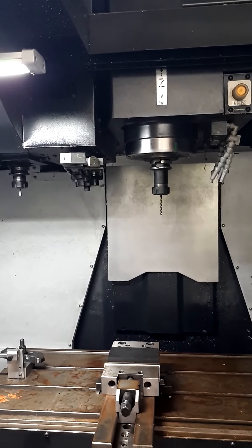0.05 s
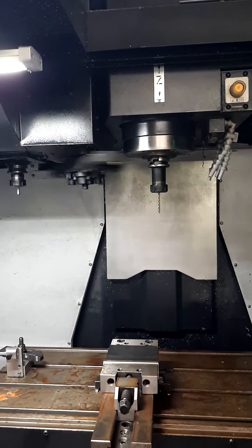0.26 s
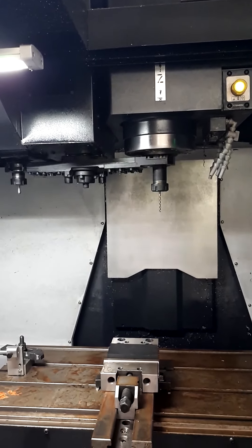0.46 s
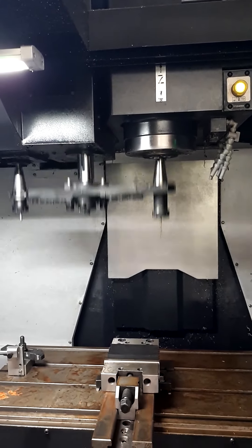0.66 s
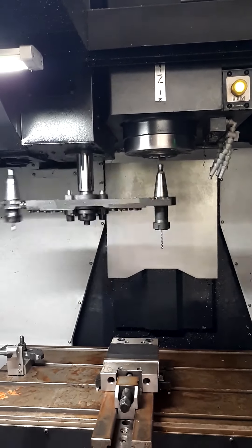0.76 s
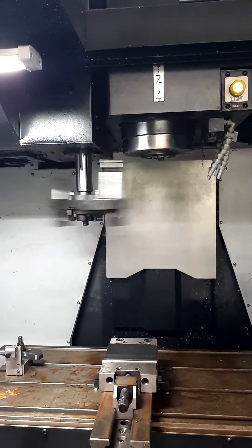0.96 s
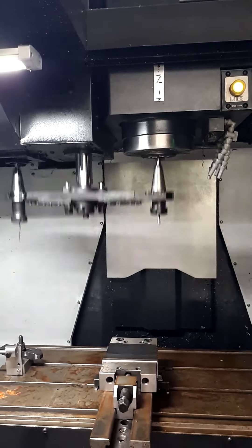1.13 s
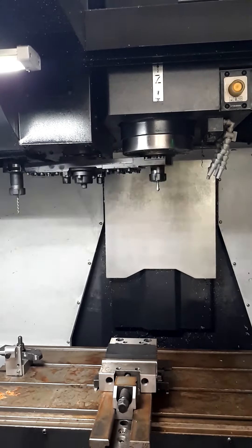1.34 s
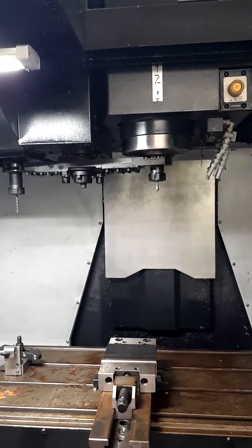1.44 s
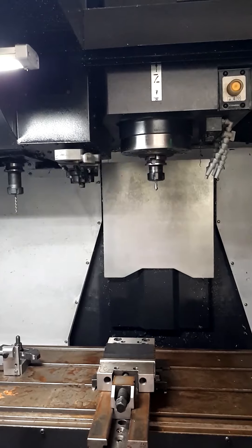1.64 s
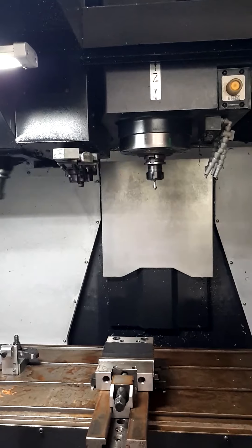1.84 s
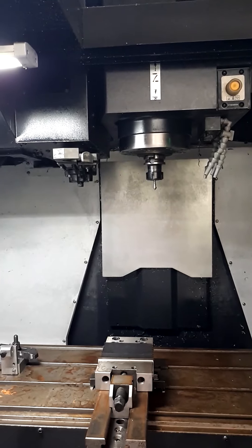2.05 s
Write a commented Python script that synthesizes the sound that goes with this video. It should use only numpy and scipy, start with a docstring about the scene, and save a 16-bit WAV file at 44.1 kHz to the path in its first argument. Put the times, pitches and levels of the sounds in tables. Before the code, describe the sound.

A loud, bright compressed-air blast from a machining centre's spindle fills about 0.5-1.65 s, with a wavering high whistle and brief squeals near 0.7 and 1.35 s. Before it, faint leak hiss, a small clunk and puff at 0.2 s, then hard clunks, valve puff and drive rumble from 0.44 s. Closing clunks and puffs follow at 1.4-1.8 s, leaving leaking air in a close, metallic enclosure.

```python
"""Inside the sheet-metal enclosure of a machining centre, two close microphones hear a tool change.
Air blasts through the spindle taper as noise with fixed and moving resonances, whistling at an edge
and squealing briefly. The arm clunks onto the holders: dying contacts ring the modes of arm and frame.
Valves puff in decaying hiss. The drive rumbles, a leak hisses and the shop lies behind, all shaped noise."""
import sys
import numpy as np
from scipy import signal
from scipy.fft import rfft, irfft
from scipy.io import wavfile

SR = 44100
rng = np.random.default_rng(int(sys.argv[2]) if len(sys.argv) > 2 else 0)


def boost_factor(decibels):
    """Convert a level in decibels to a linear amplitude factor."""
    exponent = np.asarray(decibels, float) / 20
    return 10 ** exponent


def persist_wave(psi):
    """Save psi, clipped to +-1, as 16-bit WAV."""
    counts = np.round(np.clip(psi, -1, 1) * 32767).astype(np.int16)
    wavfile.write(sys.argv[1], SR, np.atleast_2d(counts).T)


N = 92610
T, HZ = np.arange(N) / SR, np.arange(N // 2 + 1) * SR / N   # time in s, spectrum bins in Hz

# Every colour table gives a spectrum's shape: pitch_hz, density_db (per Hz, relative).
# Air blast: start_s, level_db, extra_db above SPLIT_HZ, bore_hz, bore_level_db
BLAST = [(.5,-52,12,8320,-133),(.6,-53,16,8520,-53),(.65,-33,4.5,8300,-46),(.8,-29,-2,8340,-35.5),(.95,-32,1.5,8460,-39),(1.1,-31.5,2.5,8450,-32.5),(1.17,-32.5,3.5,8660,-31),(1.3,-30,-0.5,8610,-27.5),(1.42,-31.5,5,8490,-31.5),(1.45,-35,4.5,8750,-43),(1.5,-34.5,-3,8880,-46),(1.6,-43,10,8480,-53),(1.65,-43,3,8560,-53),(1.74,-76,-31,8580,-75)]
BLAST_COLOUR = [(180,-23),(300,-24.5),(620,-15.5),(900,-15),(1250,-15),(1700,-14.5),(2200,-11),(2700,-10),(4000,-7),(5250,-11.5),(6200,-12),(7000,-9),(7700,-1.5),(8600,-3),(9200,-14),(10200,-6),(11200,-13.5),(13500,-14.5),(15900,-13.5)]
SPLIT_HZ, BORE_WIDTH_HZ, BORE_LEFT_DB = 8200, 174, 4.5
# Fixed taper resonances: pitch_hz, width_hz, level_db (at the blast's mean level)
TAPER = [(770,65,-56),(960,200,-59),(1691,76,-57.5),(2700,240,-50),(5974,750,-45)]
TAPER_WANDER = 0.025   # share of pitch
TOOL_OUT_S, TOOL_IN_S, TAPER_FADE_S = 0.535, 1.45, 0.11   # the taper stands open between

# Edge whistle pitch: start_s, pitch_hz
WHISTLE_PITCH = [(.53,12380),(.61,12480),(.68,12580),(.87,12645),(1.05,12720),(1.3,12725),(1.38,12760),(1.45,12610),(1.5,12630),(1.64,12590)]
# Edge whistle level before the left-right balance: start_s, level_db
WHISTLE_LEVEL = [(.52,-62),(.58,-46),(.7,-38.5),(.75,-35.5),(.8,-41),(.88,-35),(.99,-39),(1.05,-47),(1.15,-37),(1.24,-35.5),(1.37,-44.5),(1.42,-31.5),(1.47,-28),(1.5,-31.5),(1.56,-47),(1.61,-48),(1.65,-70)]
WHISTLE_WIDTH_HZ, WHISTLE_LEFT_DB = 82, 10
WHISTLE_FLICKER_DB, WHISTLE_FLICKER_HZ = 3.5, 18.0
# Brief resonances as the tool opens and closes the gap: start_s, length_s, pitch_hz, width_hz, level_db
SQUEALS = [(0.652,0.12,3100,890,-36),(1.322,0.086,2700,198,-34.5),(1.417,0.02,6170,120,-31)]

# Arm clunks: start_s, level_db (before the enclosure mix), rattle_t60_s, contact_centre_hz, width_octaves
CLUNKS = [(.196,-42,0.87,680,0.57),(0.437,-47.5,0.96,171,0.39),(.45,-41.5,0.13,885,0.18),(.458,-33.5,0.76,1554,0.94),(.472,-36.5,0.3,450,0.6),(.492,-45.5,0.02,430,0.46),(.517,-33.5,0.15,370,0.3),(0.575,-38.5,0.6,392,0.39),(0.628,-44.5,1,148,0.96),(1.401,-49.5,1.6,450,0.68),(1.445,-49,0.51,125,0.4),(1.543,-39.5,0.49,516,0.67),(1.537,-39,0.42,824,0.18),(1.764,-51.5,0.87,600,0.46),(1.764,-50,0.18,182,0.49),(1.805,-51,0.041,1600,2)]
# Modes of arm and frame: pitch_hz, level_db (relative, before scatter), t60_s
FRAME = [(120,2,0.61),(156,-0.5,0.11),(202,-18,0.083),(335,-11,0.083),(361,-2,0.18),(401.5,2,0.31),(416.2,4.5,0.15),(434,6,0.11),(480,1.5,0.13),(549,7.5,0.096),(600,5,0.059),(705,12,0.035),(819.5,5.5,0.098),(881,8.5,0.07),(957,0,0.07),(1133,7.5,0.017),(1417,9,0.012),(1650,9,0.0062),(2287,18.5,0.0069),(3240,20,0.011)]
RATTLE_PER_S, MODE_SCATTER_DB = 500, 2
FIRST_BLOW = 4   # size of the first contact against the rattle
ENCLOSURE_T60_S, ENCLOSURE_DB, DIRECT_DB = 0.2, -2, -4

# Valve puffs: start_s, level_db, attack_s, t60_s
PUFFS = [(0.193,-36.5,0.0074,0.51),(0.436,-29.5,0.0011,0.66),(0.444,-39,0.013,0.15),(1.516,-32.5,0.017,1),(1.763,-38.5,0.0032,0.13),(1.771,-40,0.02,0.68),(1.9,-49,0.0097,0.35)]
PUFF_COLOUR = [(150,-26),(500,-8),(900,-15),(1500,-11.5),(1850,-18),(2300,-11),(3200,-9),(5350,-18.5),(6800,-10.5),(7860,-5),(9000,-11.5),(10800,-19),(16000,-25)]
# Drive rumble: start_s, level_db
RUMBLE = [(0.0, -62), (0.02, -68), (0.41, -60.5), (0.44, -46), (0.48, -40.5), (0.61, -52), (0.64, -52),
          (0.76, -48.5), (0.79, -56), (1.01, -58.5), (1.4, -60.5), (1.46, -44), (1.5, -46), (1.75, -50),
          (2.1, -60)]
RUMBLE_COLOUR = [(12, -65), (20, -35), (38, -5.5), (86, -10), (113, -4), (209, -9.5), (231, -10), (300, -9),
                 (390, -32), (660, -120)]
# Air leak: start_s, level_db
LEAK = [(0,-47),(.42,-47),(1.74,-53),(1.8,-41.5),(2.1,-41.5)]
LEAK_COLOUR = [(530, -68), (900, -39), (1700, -17), (1990, -13), (2140, -20), (2270, -14), (2470, -11.5),
               (4250, -12.5), (6250, -14.5), (7580, -5.5), (8550, -5), (9310, -12.5), (16000, -26.5)]
# Shop background
SHOP_COLOUR = [(15,-47),(30,-18),(110,-29),(190,3),(300,-1),(340,-10.5),(900,-6.5),(1400,-9),(2500,-21.5),(3500,-38)]
SHOP_DB = -61

# Likeness of the two microphones: pitch_hz, likeness (0 to 1)
LIKENESS = [(30,0.94),(120,1),(250,0.87),(500,0.77),(1000,0.29),(1500,0.12),(2500,0.78),(4000,0.31),(7500,0.84),(9500,0.68),(12000,0.23),(15000,0.2)]
# Balance of the two microphones: pitch_hz, left_minus_right_db
LEFT_DB = [(60, -0.5), (130, 0), (290, -1.5), (640, -1.5), (1410, -1.5), (3100, -3.5), (6820, -5),
           (15000, 7.5)]
# Phase lead of the left microphone: pitch_hz, lead_radians
LEFT_LEADS = [(100,0),(780,-0.11),(1500,1.74),(2500,1.27),(4000,2),(5400,9),(7000,5.5),(16000,9)]
RIPPLE_DB, RIPPLE_HZ = 2.2, 40   # the enclosure's dense resonances in the flickering hisses
CUTOFF_HZ = 15900


def blast():
    """Jet noise, fixed taper resonances and a bore resonance that moves with the tool."""
    level_db, top_db, bore_hz, bore_db = in_time(BLAST)
    on = (T > BLAST[0][0]) & (T < BLAST[-1][0])
    jet = flickering(BLAST_COLOUR, flicker_db=1.2, rate=35.0)
    top = signal.sosfilt(signal.butter(4, SPLIT_HZ, "high", fs=SR, output="sos"), jet)
    low = signal.sosfilt(signal.butter(4, SPLIT_HZ, "low", fs=SR, output="sos"), jet)
    taper = np.zeros((2, N))
    for hz, width_hz, db in TAPER:
        level = boost_factor(db - level_db[on].mean() + 1.97 * drift(27.0))
        taper += level * moving_band(hz * (1 + TAPER_WANDER * drift(4.0)), width_hz)
    taper *= np.clip(np.minimum(T - TOOL_OUT_S, TOOL_IN_S - T) / TAPER_FADE_S + 1, 0, 1)
    bore = boost_factor(bore_db + 2.0 * drift(26.0)) * moving_band(bore_hz, BORE_WIDTH_HZ)
    bore *= boost_factor(np.array([[BORE_LEFT_DB / 2], [-BORE_LEFT_DB / 2]]))
    return on * (boost_factor(level_db) * (low + boost_factor(top_db) * top + taper) + bore)


def whistle():
    """A wavering edge tone, stronger at the left microphone: narrow noise following a pitch curve."""
    (hz,), (db,) = in_time(WHISTLE_PITCH), in_time(WHISTLE_LEVEL)
    one, other = moving_band(hz, WHISTLE_WIDTH_HZ)
    one = one / np.sqrt(np.abs(signal.hilbert(one)) + 0.29)   # the tone partly steadies itself
    left = unit(one) * boost_factor(WHISTLE_LEFT_DB / 2)
    right = (unit(one) + 1.06 * unit(other)) * boost_factor(-WHISTLE_LEFT_DB / 2)
    on = (T > WHISTLE_LEVEL[0][0]) & (T < WHISTLE_LEVEL[-1][0])
    flicker_db = WHISTLE_FLICKER_DB * np.minimum(drift(WHISTLE_FLICKER_HZ), 1)
    return np.array([left, right]) * boost_factor(db + flicker_db) * on


def squeals():
    """Short resonant bands of hiss, each under a rounded envelope."""
    out = np.zeros((2, N))
    for s, length, hz, width_hz, db in SQUEALS:
        envelope = np.sin(np.pi * np.clip((T - s) / length, 0, 1))
        out += boost_factor(db) * envelope * steady(peak(hz, width_hz))
    return out


def clunks():
    """Each clunk is a dying rattle of contacts into the frame modes near its centre, then the enclosure."""
    sizes = boost_factor(3 * np.minimum(rng.exponential(1, N), 2)) * rng.choice([-1, 1], N)
    contacts = sizes * (rng.random(N) < RATTLE_PER_S / SR)
    scatter_db = MODE_SCATTER_DB * rng.standard_normal((len(CLUNKS), len(FRAME)))
    direct = np.zeros(N)
    for (s, db, rattle_t60, centre_hz, width), scatter in zip(CLUNKS, scatter_db):
        i = int(s * SR)
        ring = np.zeros(N)
        for (hz, mode_db, t60), extra_db in zip(FRAME, scatter):
            off_centre_db = 11.5 * (np.log2(hz / centre_hz) / width) ** 2
            ring += boost_factor(mode_db + extra_db - off_centre_db) * dying(t60) * np.sin(2 * np.pi * hz * T)
        rattle = (np.roll(contacts, -i) + FIRST_BLOW * (T == 0)) * dying(rattle_t60)
        blow = signal.fftconvolve(rattle, ring)[:N - i]
        edges_hz = centre_hz * 2.0 ** np.array([-width, width])
        blow = signal.sosfilt(signal.butter(2, edges_hz, "band", fs=SR, output="sos"), blow)
        direct[i:] += boost_factor(db) * blow / np.sqrt(np.mean(blow[:SR // 10] ** 2))   # rms of the first 0.1 s
    echo = unit(steady(np.ones_like) * dying(ENCLOSURE_T60_S)) / np.sqrt(N)
    echoed = signal.fftconvolve(direct[None], echo, axes=-1)[:, :N]
    return boost_factor(DIRECT_DB) * direct + boost_factor(ENCLOSURE_DB) * echoed


def puffs():
    """Each valve opens quickly and its hiss dies away."""
    shape = np.zeros(N)
    for s, db, rise, t60 in PUFFS:
        fall_db = 60 * np.clip(T - s - rise, 0, None) / t60
        shape += boost_factor(db - fall_db) * np.clip((T - s) / rise, 0, 1)
    return shape * flickering(PUFF_COLOUR, flicker_db=0.6, rate=30.0)


def rumble():
    """The drive's low noise, swelling and sinking along a level curve."""
    (db,) = in_time(RUMBLE)
    return boost_factor(db) * steady(coloured(RUMBLE_COLOUR))


def leak():
    """Leaking air: flickering hiss along a level curve."""
    (db,) = in_time(LEAK)
    return boost_factor(db) * flickering(LEAK_COLOUR, flicker_db=1.3, rate=45.0)


def shop():
    """The shop behind, as coloured noise at a constant level."""
    return boost_factor(SHOP_DB) * steady(coloured(SHOP_COLOUR))


def flickering(table, flicker_db, rate):
    """Hiss whose half-octave bands flicker partly together; rms 1."""
    pair, shared = hiss(coloured(table)) * ripple(), drift(rate)
    step = 2 * np.log2((HZ + 1) / 1000)   # half octaves above 1 kHz; the first band takes all below
    out = np.zeros((2, N))
    for share in np.eye(9):
        band = irfft(pair * np.interp(step, np.arange(len(share)), share), N)
        out += band * boost_factor(flicker_db * (0.53 * shared + drift(rate)))
    return unit(out)


def moving_band(centre_hz, width_hz):
    """Narrow stereo noise whose centre follows a curve, by shifting its frequency."""
    start = centre_hz.mean()
    band = signal.hilbert(steady(peak(start, width_hz)))
    return np.real(band * np.exp(2j * np.pi * np.cumsum(centre_hz - start) / SR))


def steady(gain):
    """Smooth stereo hiss, rms 1."""
    return unit(irfft(hiss(gain), N))


def hiss(gain):
    """Spectrum of stereo noise as two close microphones hear it, coloured by gain(Hz)."""
    mid, side = rfft(rng.standard_normal((2, N)))
    alike = np.clip(at_hz(LIKENESS, HZ), 0, 1)
    pair = np.sqrt(1 + alike) * mid + np.sqrt(1 - alike) * side * [[1], [-1]]
    half = boost_factor(at_hz(LEFT_DB, HZ) / 2) * np.exp(0.5j * at_hz(LEFT_LEADS, HZ))   # half the difference each
    return gain(HZ) * pair * [half, 1 / half]


def ripple():
    """Random fine resonances of the enclosure, as gain over frequency."""
    hz = np.arange(0, SR / 2 + 20, 10.0)
    bump = np.exp(-((hz - 500) / RIPPLE_HZ) ** 2)
    wavy = signal.fftconvolve(rng.standard_normal(len(hz)), bump, "full")[50:50 + len(hz)]
    return boost_factor(RIPPLE_DB * np.interp(HZ, hz, unit(wavy)))


def coloured(table):
    """Gain from a spectrum table."""
    return lambda hz: boost_factor(at_hz(table, hz))


def peak(centre_hz, width_hz):
    """Gain of a resonance applied twice."""
    return lambda hz: 1 / (1 + (2 * (hz - centre_hz) / width_hz) ** 2)


def at_hz(points, hz):
    """Table read on a log-frequency axis."""
    point_hz, value = np.transpose(points)
    return np.interp(np.log(hz + 1), np.log(point_hz), value)


def in_time(rows):
    """Columns joined by straight lines over time."""
    s, *columns = np.transpose(rows)
    return [np.interp(T, s, column) for column in columns]


def drift(rate):
    """Slow chance: noise low-passed twice at rate Hz, rms 1."""
    r = np.exp(-2 * np.pi * rate / SR)
    slow = signal.lfilter([1], [1, -2 * r, r * r], rng.standard_normal(N + SR))
    return unit(slow[SR:])   # the first second lets the filter settle


def dying(t60):
    """Exponential decay from the start, 60 dB in t60 seconds."""
    return boost_factor(-60 * T / t60)


def unit(x):
    """Signal scaled to rms 1."""
    return x / np.sqrt(np.mean(x ** 2) + 1e-20)


def scene():
    """All sources at the two microphones, from the air blast back to the shop."""
    return blast() + whistle() + squeals() + clunks() + puffs() + rumble() + leak() + shop()


def low_pass(x):
    """Removes everything above the highest recorded frequency."""
    return signal.sosfilt(signal.butter(12, 16910, fs=SR, output="sos"), x)


def record(dry):
    """The top of the microphone pair's sound is cut off sharply."""
    cut = irfft(rfft(dry) * (HZ < CUTOFF_HZ), N)
    return low_pass(cut)


dry = scene()
out = record(dry)
persist_wave(out)
```